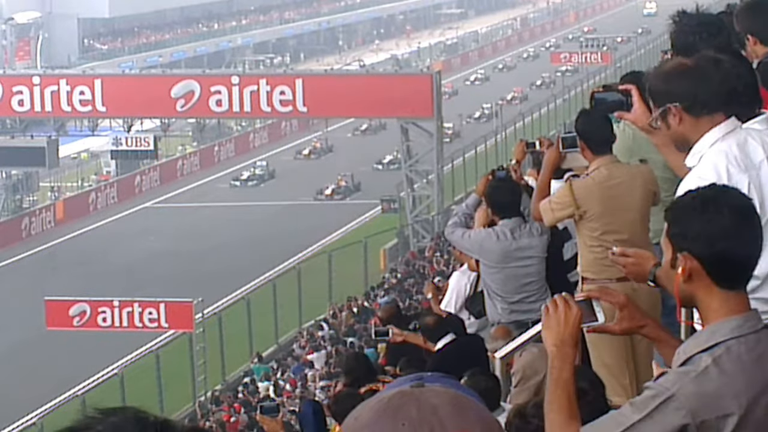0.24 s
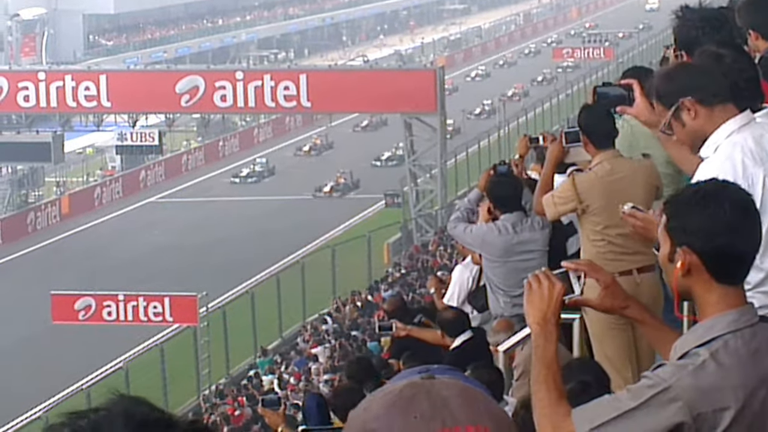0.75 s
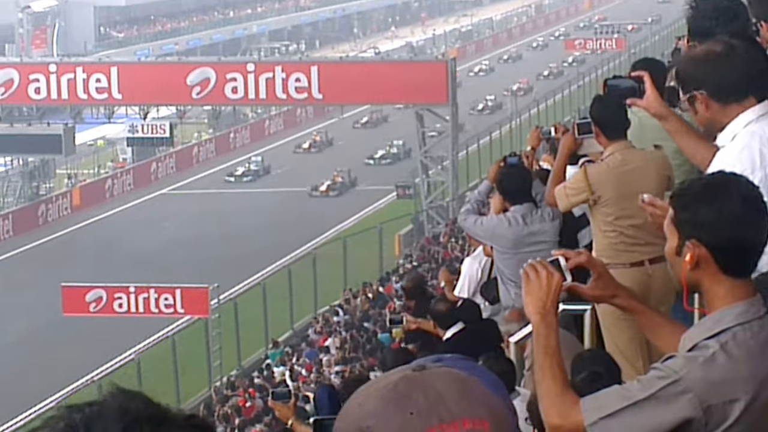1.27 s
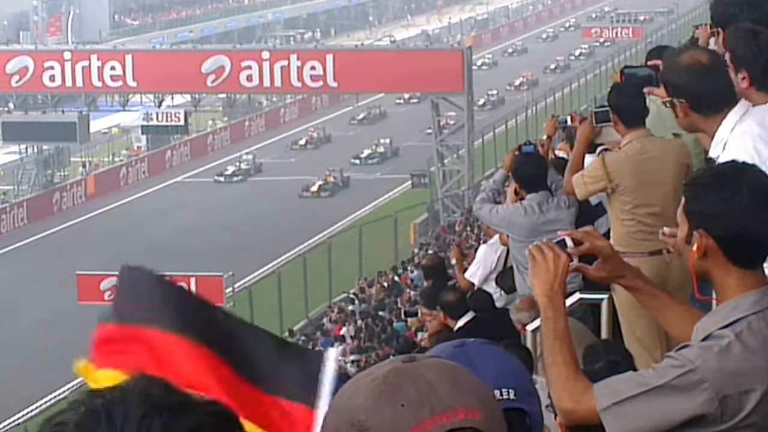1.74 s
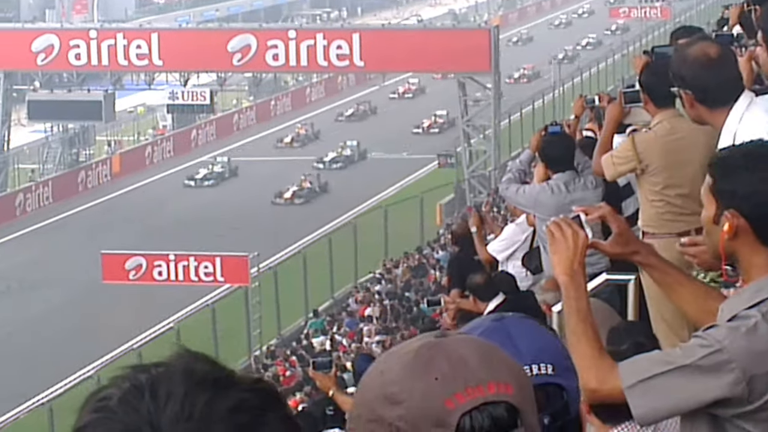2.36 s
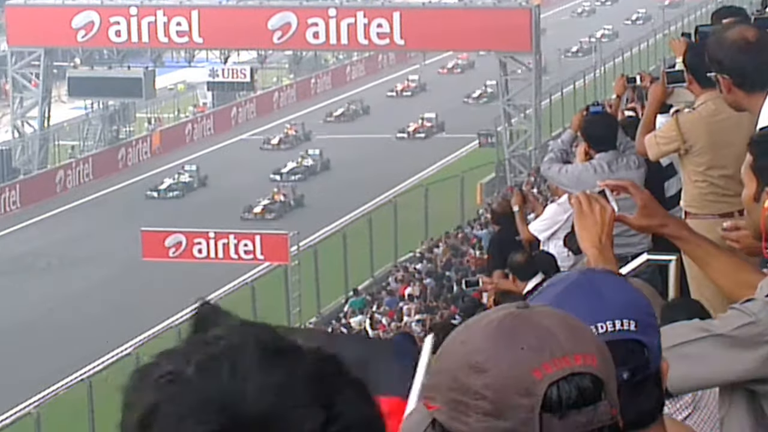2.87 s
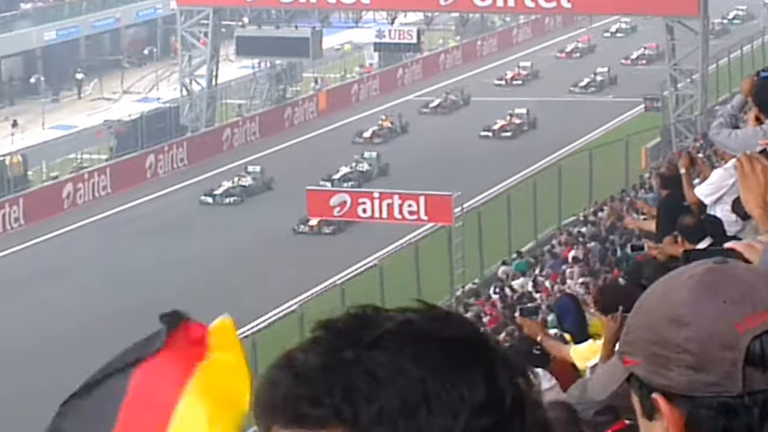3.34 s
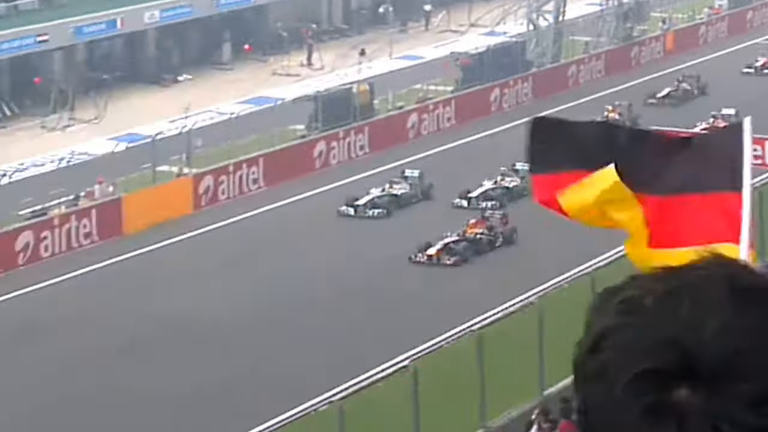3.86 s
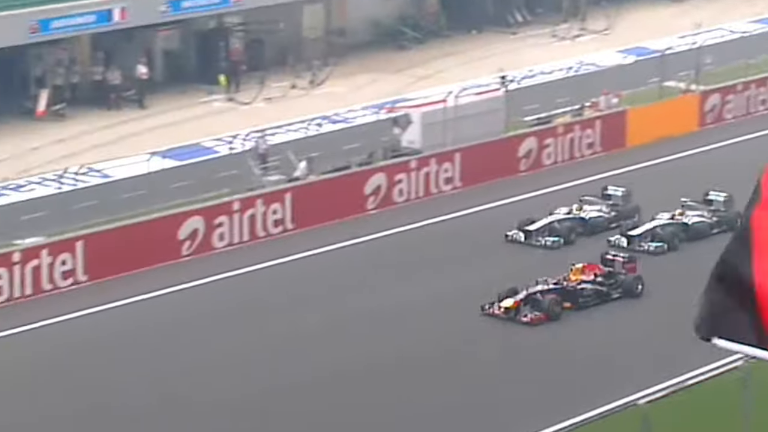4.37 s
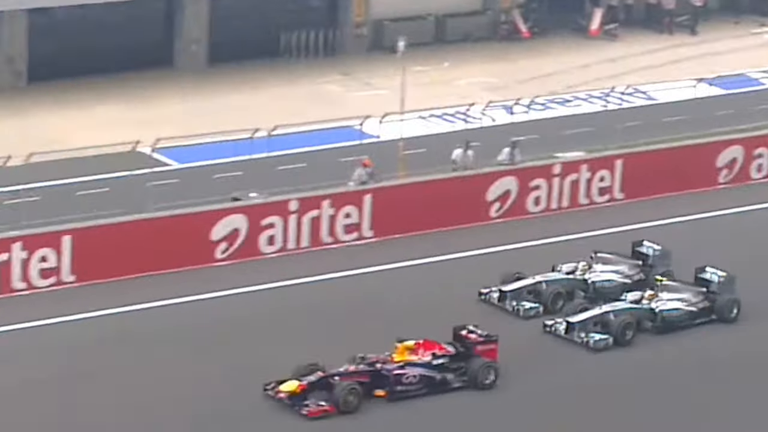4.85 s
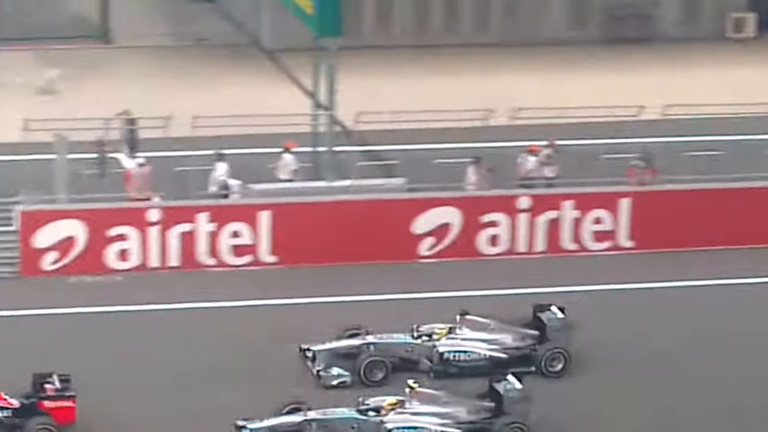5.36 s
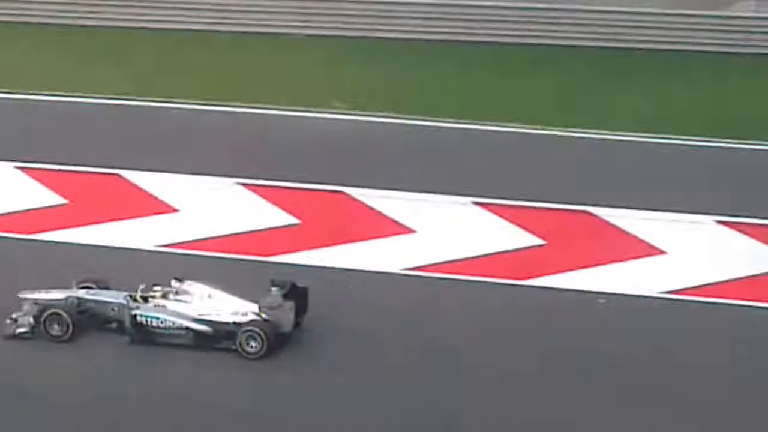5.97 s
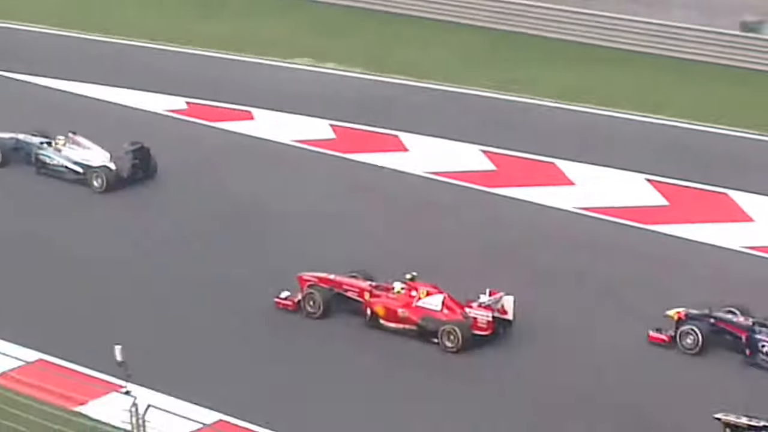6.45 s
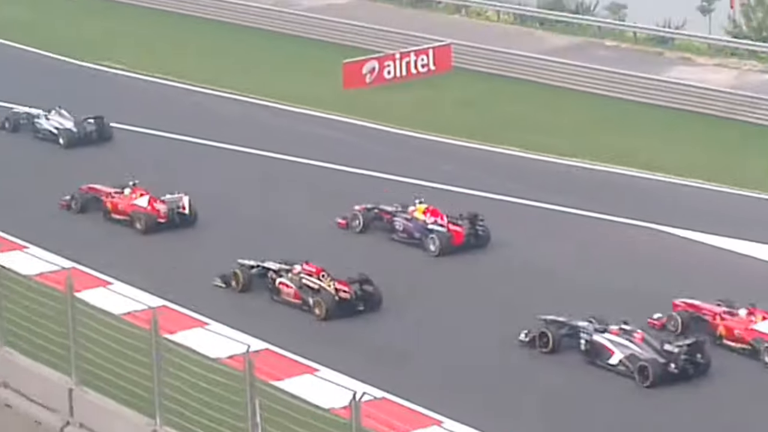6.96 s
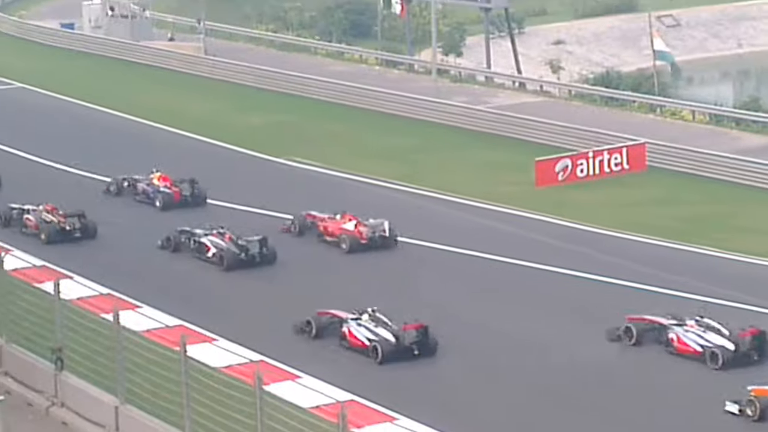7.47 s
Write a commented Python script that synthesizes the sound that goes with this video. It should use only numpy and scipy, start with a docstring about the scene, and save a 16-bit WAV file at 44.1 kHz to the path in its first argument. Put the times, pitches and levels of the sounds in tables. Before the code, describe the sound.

Heard from a grandstand, a full grid of racing cars holds a loud, dense, nasal scream. It surges and flickers, bogs as clutches bite, stutters with tiny dropouts, then sinks in level. The leaders whine closer and sweep by with a brighter, raspier, hissing edge, followed by more cars. Handheld outdoor stereo, little bass, faint wind and short echoes off the stands.

```python
"""A grandstand at a race track: a pack of racing cars holds its revs on the grid, bogs down at launch, screams past.
The pack is pulse trains, one for each car, mixed with noise; single cars stand out as stacks of wavering sines.
The level falls and the sound brightens as the pack arrives; the roar surges, flickers and briefly drops out.
Filtered noise makes the echoes off the stands and a light wind rumble; four thin ticks are high-passed clicks."""
import sys
import numpy as np
from scipy import signal
from scipy.fft import rfft, irfft, next_fast_len
from scipy.io import wavfile
from scipy.ndimage import uniform_filter1d

SR = 44100
rng = np.random.default_rng(int(sys.argv[2]) if len(sys.argv) > 2 else 0)


def generate_wav(sig):
    """Save sig (samples, or channels by samples) to the path in sys.argv[1] as 16-bit PCM at SR."""
    pcm = np.round(np.clip(np.atleast_2d(sig).T, -1, 1) * 32767).astype(np.int16)
    wavfile.write(sys.argv[1], SR, pcm)


N = 340011

# Loudness of the pack before surges, dips and panning: (time [s], level [dB])
PACK_LEVEL = [(0, -14), (.5, -15), (.9, -12.5), (1.2, -16.5), (1.6, -21), (1.9, -16), (2.23, -18),
              (2.45, -20), (2.9, -23.5), (3.15, -27.5), (3.3, -29.5), (3.65, -29), (3.86, -29),
              (3.95, -30.5), (5.2, -30.5), (6, -31.5), (7, -30.5), (7.71, -30)]
# Revs: (time [s], mean firing rate of one bank [Hz], spread between cars [0-1], roughness [0-1, clipped])
REVS = [(0, 470.1, 0.05, 0.72), (.9, 475.6, 0.04, 0.79), (1.3, 549.4, 0.15, 0.85), (1.7, 569, 0.05, 0.85),
        (2.1, 575.7, 0.14, 0.1), (2.6, 522.5, 0.12, 1.25), (3.2, 572, 0.12, 0.07), (3.7, 562.5, 0.15, 0.62),
        (4, 590.4, 0.11, 0.08), (4.3, 562.8, 0.09, 0.19), (4.65, 589.4, 0.09, 0.24), (5, 621.3, 0.1, 0.38),
        (5.25, 587.3, 0.06, 0.46), (5.6, 566.3, 0.05, 0.7), (6.4, 561.2, 0.08, 0.89),
        (7, 541.6, 0.12, 0.66), (7.71, 608.5, 0.06, 0.8)]
# Where the colour table is read: grid ends, clutches bite, launch from-to, pulling away, approach from-to,
# passing from-to, later cars: (time [s])
STAGE_TIMES = [.6, 1.1, 1.6, 2.5, 3.1, 3.7, 4.2, 5.3, 6.3, 7.1]
# Colour of the pack, relative within each stage: (frequency [Hz], grid [dB], clutches bite [dB], launch [dB],
# pulling away [dB], approach [dB], passing [dB], later cars [dB])
COLOUR = [(166, -54, -61.5, -77, -58, -45, -38, -40), (266, -39.5, -13, -30.5, -46, -32, -25, -24),
          (348, -7, -11, -5, -17, -25.5, -22, -22), (443, -3.5, -9, -19.5, -3.5, -13.5, -14.5, -15),
          (492, -21.5, -8, -8, -7, -6.5, -15.5, -12.5), (630, -4.5, -5.5, -4, -12, -6, -7.5, -7),
          (802, -2.5, -11.5, -6.5, -7.5, -7.5, -11.5, -10), (1017, 1, 0, 0.8, 0, 0, -0.5, -1),
          (1248, 0, -3.5, -5, -5, -4, -0.5, -1.5), (1464, -4, -9.5, -7.5, -5.5, -6, -3, -2.5),
          (1874, -9.5, -15, -14, -14.5, -13.5, -5.5, -6.5),
          (3400, -9, -11, -11.5, -11.5, -10.5, -2.5, -3.5),
          (5180, -27, -27, -28.5, -28.5, -26.5, -13.5, -17),
          (7340, -34.5, -29, -32.5, -26.5, -27.5, -13.5, -17.5),
          (8370, -48.5, -42, -45, -36.5, -34, -18.5, -21.5), (10440, -58, -54, -54.5, -41.5, -41, -24, -25),
          (12060, -99, -91, -80, -49, -46, -27.5, -29), (15300, -99, -99, -99, -60, -53, -32, -33)]
# Brief swells (+) and dips (-), most in the treble: (time [s], treble change [dB], width at half height [s])
SURGES = [(.11, 5.5, 0.016), (.22, 6.5, 0.025), (.27, -2, 0.022), (.44, 5, 0.14), (.56, -5.5, 0.074),
          (.72, 0.5, 0.02), (.79, -12, 0.029), (.87, 3, 0.026), (.96, -4.5, 0.22), (1.06, 5.5, 0.072),
          (1.17, -3, 0.04), (1.21, 4.5, 0.037), (1.28, 3, 0.056), (1.31, -3.5, 0.018), (1.5, 8.5, 0.22),
          (1.545, 4.5, 0.014), (1.69, -3.5, 0.1), (1.74, 6, 0.044), (1.775, -6.5, 0.024), (1.81, 4, 0.025),
          (1.835, -7, 0.019), (1.865, 3, 0.022), (1.97, 3.5, 0.025), (2.16, 6, 0.03), (2.31, -2.5, 0.04),
          (2.42, 4.5, 0.03), (2.55, -2.5, 0.14), (2.77, 6, 0.028), (2.96, -3.5, 0.35), (4.56, 4, 0.049),
          (4.75, 0.5, 0.28), (4.84, 6.5, 0.015), (5.19, 0, 0.037), (5.26, -2, 0.098), (5.58, 2.5, 0.051),
          (5.89, 5, 0.078), (6.13, 5.5, 0.033), (6.22, 4, 0.066), (6.42, 3, 0.2), (7.24, -1, 0.027),
          (7.45, -3.5, 0.033), (7.54, -3, 0.019), (7.63, 1, 0.068)]
# The whole roar drops for an instant: (time [s], change [dB], width at half height [s])
DIPS = [(.525, -8, 0.012), (.543, -5, 0.016), (1.195, -3.5, 0.016), (1.677, -7, .016), (1.722, -4, 0.0083),
        (.275, -3.5, 0.027), (.85, -2, 0.0072), (1.42, -1.5, 0.033), (1.945, -1, 0.014), (5.235, -1, 0.019)]
# Cars that stand out: (levels of multiples 1, 2, .. of the firing rate [dB], pitch waver [rms share],
# curve of (time [s], bank firing rate [Hz], level added to every multiple [dB]))
CARS = [ ((-1, -9, -3, -13, -21, -16), .0017, [(0, 490, -23), (.22, 492, -24), (.5, 492, -22),
        (.55, 491, -24), (.66, 490, -21), (.84, 490, -19), (.9, 490, -34), (1.2, 491, -36)]),
        ((-20, 6.5, 4, -23), .008, [(0, 473.5, -31.5), (.4, 472.8, -29.5), (.8, 475.3, -33.5),
        (1.2, 475, -30)]), ((-9, -1.5, 2.5, -20), 0.0044, [(0, 459, -27), (.5, 458, -25),
        (1, 459.4, -39.5)]), ((-1, -15, -10, -20), .004, [(0, 429, -24), (.2, 431, -27), (.45, 428, -29),
        (.56, 430, -30), (.68, 433, -24), (.75, 433, -29), (.83, 435, -23), (.91, 431, -30)]),
        ((-18.5, 0.5, -26, -24), .007, [(0, 484, -28), (.15, 477.8, -22.5), (.35, 480, -19),
        (.5, 484.6, -27), (.65, 486.8, -18), (.8, 485, -20), (.95, 485.6, -16.5), (1.13, 488.4, -25)]),
        ((-28, -2.5, -15.5, -17), .004, [(1.06, 540, -30), (1.13, 545, -18), (1.19, 535, -23),
        (1.22, 538, -15), (1.3, 548, -19), (1.4, 560, -20), (1.5, 560, -24), (1.55, 560, -18),
        (1.62, 565, -18), (1.7, 560, -24), (1.75, 555, -19), (1.78, 552, -27), (1.85, 550, -27)]),
        ((-23, -0.5, -7, -21), 0.0055, [(1.75, 530.7, -40), (1.9, 510, -25), (2, 502.9, -21),
        (2.15, 520, -33), (2.3, 483.4, -26.5), (2.5, 497, -42)]), ((-14.5, -5, -23, -22),
        0.012, [(1.4, 286.9, -33), (1.8, 289, -25), (2.15, 276, -27.5), (2.45, 300, -40),
        (2.7, 324.8, -35)]), ((-2, -9, -8, -12), 0.0078, [(3.3, 530.2, -50), (3.6, 561.5, -35),
        (3.85, 576.2, -36.5), (4, 624, -52), (4.2, 606, -51), (4.45, 559.4, -34.5), (4.8, 585.9, -69),
        (5.3, 571.7, -35.5), (5.6, 543.2, -50)]), ((-10.5, -3, -8.5, -12), 0.0089, [(1.5, 327, -23.5),
        (1.72, 337.4, -27), (1.82, 331, -20.5), (1.92, 328.7, -27), (2, 331, -25.5), (2.2, 320.5, -22),
        (2.35, 325.3, -32), (2.5, 349.6, -24), (2.55, 360, -25), (2.63, 371.2, -25.5), (2.7, 386, -29),
        (2.8, 392, -40)]), ((-6, -4.5, -5, -22), 0.0081, [(1.9, 350, -33), (2.25, 341.4, -29),
        (2.42, 370, -25.5), (2.55, 342, -36)]), ((0.5, -19, -29, -22), 0.0031, [(2.99, 633.4, -34),
        (3.2, 634.2, -30.5), (3.45, 629.4, -43)]), ((-18, -4, -6, 0, -8, -4, -8), .005, [(4.48, 596, -46),
        (4.54, 600, -38), (4.63, 615, -42), (4.72, 628, -36), (4.8, 632, -41), (4.88, 638, -38),
        (4.96, 640, -46)]), ((-12, 0, -9, -14), .018, [(3.3, 585, -40), (3.45, 572, -38), (3.65, 550, -35),
        (3.9, 540, -38)]), ((-8, 0, -9, -14), .008, [(3.9, 590, -40), (4, 622, -35), (4.08, 630, -39),
        (4.18, 635, -36), (4.27, 637, -40), (4.4, 640, -38)]), ((-14, -1, -8, -17),
        0.0162, [(4.2, 589.6, -51), (4.35, 585.7, -35), (4.6, 592.5, -40), (4.8, 603.6, -36.5),
        (5.1, 612, -41), (5.2, 600, -37)]), ((-10, 0, -7, -12, -11, -11), .008, [(4.05, 515, -39),
        (4.25, 550, -41), (4.4, 560, -37), (4.5, 580, -37), (4.6, 605, -44), (4.78, 625, -35),
        (4.95, 640, -42), (5.07, 648, -38), (5.2, 660, -41), (5.27, 660, -44)]), ((-9.5, -4, -6.5, -16),
        0.0069, [(5, 568.4, -50), (5.15, 536, -36), (5.38, 501, -46)]),
        ((-14, -2, -6, -1, -7, -14, -16, -16), .004, [(5.35, 568, -45), (5.44, 563, -37), (5.5, 560, -40),
        (5.58, 557, -36), (5.65, 557, -43), (5.95, 552, -44)]), ((-30, -8, -16, -8, -16, -16, -16, -3),
        .003, [(5.58, 560, -48), (5.66, 559, -43), (5.8, 557, -46), (5.9, 555, -50)]),
        ((-20, 0, -14, -14, -12), .005, [(5.65, 556, -43), (5.88, 552, -39), (5.96, 550, -35),
        (6.05, 548, -34), (6.12, 546, -38), (6.18, 542, -50), (6.46, 540, -52), (6.52, 540, -35),
        (6.58, 537, -39), (6.66, 530, -38), (6.75, 520, -50)]), ((-30, -4, -2, -10, -5, -6, -6),
        .008, [(6.05, 545, -50), (6.13, 537, -38), (6.18, 535, -47), (6.26, 535, -40), (6.32, 530, -48),
        (6.45, 517, -48)]), ((-11.5, 2.5, 5, -2.5, 0, 4.5, -13), 0.005, [(6.4, 500, -50), (6.58, 492, -43),
        (6.68, 500, -48), (6.76, 512, -44), (6.9, 505, -49), (7, 501, -47), (7.1, 495, -52)]),
        ((-20, -6, -14, -14, 0, -10), .006, [(7, 565, -48), (7.1, 585, -39), (7.17, 610, -41),
        (7.24, 612, -47), (7.32, 615, -41), (7.42, 610, -48)]), ((-7, 0, -14, -14, -8),
        0.008, [(7.2, 600, -46), (7.27, 620, -37), (7.33, 615, -35), (7.38, 618, -38), (7.42, 620, -47),
        (7.55, 626, -47)]), ((-10, 0, -14, -5, -8), 0.006, [(7.53, 630, -45), (7.63, 628, -35),
        (7.71, 600, -39)]), ]
# Left-right balance of the roar over time, added to the lean: (time [s], left minus right [dB])
PAN = [(0, 2), (.7, -0.5), (1.3, 0.5), (2.2, 0.9), (2.8, 0), (3.7, 1), (4.3, -1.2), (4.8, -1), (5.7, -1),
       (6.2, -0.5), (6.8, -1), (7.71, 0)]
# Left-right balance over the spectrum: (frequency [Hz], left minus right [dB])
LEAN = [(130, 5), (290, 2), (640, 4.5), (1410, -0.5), (3100, 0.9), (6820, -6), (10000, 1.2), (15000, -2.5)]
# Left-right likeness: (frequency [Hz], while the pack is far [0-1], while it is near [0-1])
LIKENESS = [(130, 0.48, .5), (290, 0.93, 0.39), (636, 0.93, 0.31), (1360, 0.56, 0.17), (3100, 0.38, 0.28),
            (6820, 0.34, 0.28), (15000, .35, 0.22)]
# Thin ticks, before a fixed 13 dB lift and the high-pass: (time [s], level [dB])
TICKS = [(0.3925, -50), (0.4489, -46), (0.7262, -33), (0.8664, -50)]
# Wind rumble before gusts, unsteadiness and side gain: (time [s], level [dB])
WIND_LEVEL = [(0, -69), (1, -75), (2.3, -69), (2.9, -76), (4.7, -84), (5.3, -83), (5.8, -100), (7.71, -89)]
# Gusts: (time [s], rise [dB], width at half height [s])
GUSTS = [(.42, 8, 0.13), (.87, 9, .08)]

JITTER_S = 4.5e-5   # rms unevenness of firing times, blurs the high multiples
SWELL_HZ = (1540, 4160)   # a surge grows from the bass share to full between these
BASS_SHARE, CAR_SHARE = 0.29, 0.1   # shares of a surge below the treble and in single cars
FLICKER_DB, PATCHY_DB = 0.65, 1.3   # rms chance flicker of the treble; rms patchiness over time and frequency
FLUTTER_DB, RASP_DB = 1.8, 4.5   # rms slow and fast unsteadiness of a single car's level
STEADY_WAVER = .0025   # a car that wavers less than this in pitch also holds its level more evenly
FADE_S = .05   # fade in and out of a single car
NEAR_S = (3.83, 4.59)   # the pack draws near between these times
ECHO_T60_S, FIRST_ECHO_S = 0.27, .025   # decay by 60 dB; wait before the first echo
PACK_ECHO_DB, CAR_ECHO_DB = -13, -16   # echo against dry
TICK_HZ = 8050   # ticks are heard above this
WIND_HZ, WIND_LEFT_DB = 160, 2   # rumble lies below this; left is raised and right lowered by this
MIC_BASS_HZ, CUTOFF_HZ = 200, 15735   # roar thins below the first; everything is cut above the second
STFT = dict(nperseg=768, noverlap=512)


def pack(count=16):
    """Every car fires sharp pulses at its own wandering rate; jet noise roars between them. Flat spectrum."""
    mean_hz, spread, rough = in_time(REVS)
    pulses = np.zeros(N)
    for place in np.linspace(-1, 1, count):
        wander = place + .4 * drift(.8) + .15 * drift(4)
        hz = mean_hz * (1 + spread * wander + .006 * drift(40))
        turns = np.cumsum(hz) / SR + rng.random()
        fired = np.flatnonzero(np.diff(np.floor(turns)))
        strong_weak_db = 0.77 * (-1) ** np.arange(len(fired))
        uneven_db = strong_weak_db + rng.normal(0, 2.6, len(fired))
        jitter = np.rint(rng.normal(0, JITTER_S * SR, len(fired))).astype(int)
        fired = np.clip(fired + jitter, 0, N - 1)
        pulses[fired] += from_db(uneven_db + 4.0 * drift(12.7, fired))
    rough = np.clip(rough, 0, 1)
    crackle = rng.standard_normal(N) * from_db(1.56 * drift(47))
    tone = np.sqrt(1 - rough) * rms_one(pulses - pulses.mean())
    dry_pack = tone + np.sqrt(rough) * rms_one(crackle)
    return dry_pack + from_db(PACK_ECHO_DB) * echoes(dry_pack)


def distance(x):
    """A spectral filter slides the colour from stage to stage, sets the level and lets the roar surge and flicker."""
    hz, s, cells = signal.stft(x, SR, **STFT)
    stage = np.interp(s, STAGE_TIMES, [0, 1, 2, 2, 3, 4, 4, 5, 5, 6])
    table = np.array(COLOUR)
    colour_db = 0
    for k in range(7):
        weight = np.clip(1 - abs(stage - k), 0, 1)
        colour_db = colour_db + np.outer(at_hz(table[:, [0, k + 1]], hz), weight)
    gain = from_db(colour_db)
    gain *= from_db(in_time(PACK_LEVEL, s)[0]) / np.sqrt(np.mean(gain ** 2, axis=0))
    bright = np.interp(np.log(hz + 1), np.log(SWELL_HZ), [0, 1])
    surge_share = BASS_SHARE + (1 - BASS_SHARE) * bright
    flicker_db = FLICKER_DB * drift(39, s * SR)
    swell_db = np.outer(surge_share, bumps(SURGES, s)) + np.outer(bright, flicker_db)
    # cars hide one another and echoes interfere: patches come and go
    chance = rng.standard_normal(gain.shape)
    patches = uniform_filter1d(uniform_filter1d(chance, size=4, axis=0), size=17, axis=1)
    gain *= from_db(swell_db + PATCHY_DB * rms_one(patches))
    return signal.istft(cells * gain, SR, **STFT)[1][:N] / np.std(x)


def cars():
    """Low multiples of each car's firing rate, as wavering, fluttering sines that fade in and out."""
    out = np.zeros(N)
    for orders_db, waver, rows in CARS:
        a, b = int(rows[0][0] * SR), min(int(rows[-1][0] * SR), N)
        s = np.arange(a, b) / SR
        hz, level_db = in_time(rows, s)
        # no fade at the very start or end of the scene
        rise = np.where(a > 0, s - s[0], 1)
        fall = np.where(b < N - 20, s[-1] - s, 1)
        fade = np.sin(np.pi / 2 * np.clip(np.minimum(rise, fall) / FADE_S, 0, 1)) ** 2
        phase = 2 * np.pi * np.cumsum(hz * (1 + waver * drift(26.2, s * SR))) / SR
        uneven = min(waver / STEADY_WAVER, 1)
        rasp_db = uneven * RASP_DB * drift(42, s * SR)
        shared_db = level_db + rasp_db + CAR_SHARE * bumps(SURGES, s)
        for k, order_db in enumerate(orders_db):
            flutter_db = uneven * FLUTTER_DB * drift(6.9, s * SR)
            loudness = from_db(shared_db + order_db + flutter_db)
            out[a:b] += fade * loudness * np.sin((k + 1) * phase)
    return out + from_db(CAR_ECHO_DB) * echoes(out)


def stereo(x):
    """Two microphones share the direct roar; echoes of opposite sign set them apart, by band and nearness."""
    size = next_fast_len(N)
    hz = np.fft.rfftfreq(size, 1 / SR)
    opposite = np.array([[1], [-1]])
    direct, scattered = rfft(x, size), rfft(echoes(x), size)
    lean = from_db(at_hz(LEAN, hz) / 2 * opposite)
    pairs = []
    for k in (1, 2):   # far, near
        alike = np.clip(at_hz(np.array(LIKENESS)[:, [0, k]], hz), 0, 1)
        shared = np.sqrt((1 + alike) / 2) * direct
        apart = np.sqrt((1 - alike) / 2) * scattered * opposite
        pairs.append(irfft((shared + apart) * lean, size)[:, :N])
    far_pair, near_pair = pairs
    near = np.interp(np.arange(N) / SR, NEAR_S, [0, 1])
    pan_db = in_time(PAN)[0] / 2
    return ((1 - near) * far_pair + near * near_pair) * from_db([pan_db, -pan_db])


def echoes(x):
    """Dense echoes off the stands and the pit wall: decaying noise, new on every call, of unit energy."""
    s = np.arange(SR // 2) / SR
    tail = rng.standard_normal(len(s)) * from_db(-60 * s / ECHO_T60_S) * (s > FIRST_ECHO_S)
    return signal.fftconvolve(x, tail / np.sqrt(np.sum(tail ** 2)))[:N]


def ticks():
    """Single-sample clicks through a high-pass, so only their treble is heard."""
    s, db = np.transpose(TICKS)
    clicks = np.zeros(N)
    clicks[(s * SR).astype(int)] = from_db(db + 13)
    treble = signal.butter(2, TICK_HZ, "high", fs=SR, output="sos")
    return signal.sosfilt(treble, clicks + 1e-18)


def wind():
    """Lumpy rumble on the microphones: low-passed noise of unsteady level, stronger on the left."""
    low_pass = signal.butter(2, WIND_HZ, fs=SR, output="sos")
    low = signal.sosfilt(low_pass, rng.standard_normal(N))
    level_db = in_time(WIND_LEVEL)[0] + bumps(GUSTS, np.arange(N) / SR) + 2.4 * drift(4.4)
    return from_db(level_db) * rms_one(low) * from_db([[WIND_LEFT_DB], [-WIND_LEFT_DB]])


def from_db(db):
    """Decibels to gain."""
    return 10 ** (np.asarray(db) / 20)


def rms_one(x):
    """Scale to unit rms."""
    return x / np.sqrt(np.mean(x ** 2) + 1e-20)


def in_time(rows, s=None):
    """Columns of a curve at every sample, or at the times s."""
    s = np.arange(N) / SR if s is None else s
    at, *columns = np.transpose(rows)
    return [np.interp(s, at, c) for c in columns]


def at_hz(points, hz):
    """A spectrum read on a log-frequency axis."""
    points = np.array(points)
    return np.interp(np.log(hz + 1), np.log(points[:, 0]), points[:, 1])


def bumps(rows, s):
    """Sum of bell-shaped changes in dB; length is the width at half height."""
    return sum(db * np.exp(-4 * np.log(2) * ((s - at) / length) ** 2) for at, db, length in rows)


def drift(rate, at=np.arange(N)):
    """Slow chance of unit rms: noise low-passed near rate [Hz], read at the samples at."""
    r = np.exp(-80 * np.pi * rate / SR)   # made at one value per 40 samples
    noise = rng.standard_normal(N // 40 + 2002)
    slow = signal.lfilter([1], [1, -2 * r, r * r], noise)[2000:]   # skip the filter's settling
    return np.interp(at / 40, np.arange(len(slow)), rms_one(slow))


def scene():
    """Pack and single cars through the microphones, with wind and ticks added."""
    thin = signal.butter(4, MIC_BASS_HZ, "high", fs=SR, output="sos")   # small microphones lose the bass
    roar = stereo(distance(pack()) + cars())
    roar = roar * from_db(bumps(DIPS, np.arange(N) / SR))
    return signal.sosfilt(thin, roar) + wind() + ticks()


def record(dry):
    """Overload rounds the loudest peaks off at full scale, then a steep low-pass cuts the top."""
    rounded = dry / (1 + dry ** 12) ** (1 / 12)
    low_pass = signal.ellip(12, .5, 70, CUTOFF_HZ, fs=SR, output="sos")   # 0.5 dB ripple, 70 dB stop
    return signal.sosfilt(low_pass, rounded)


dry = scene()
out = record(dry)
generate_wav(out)
```